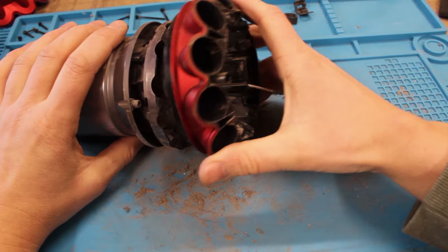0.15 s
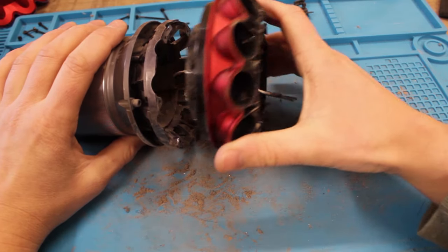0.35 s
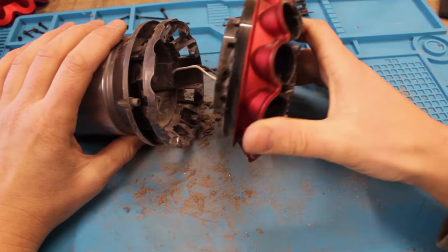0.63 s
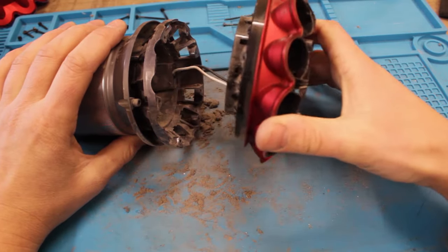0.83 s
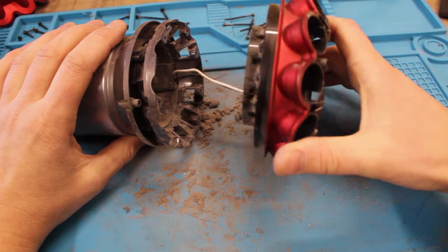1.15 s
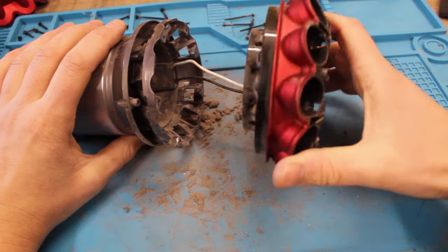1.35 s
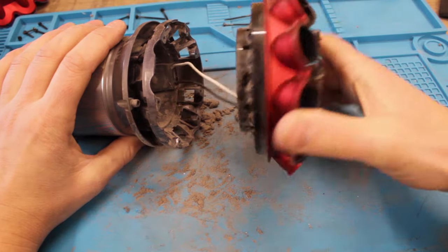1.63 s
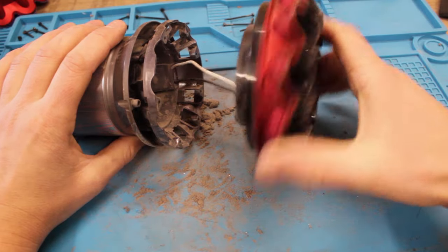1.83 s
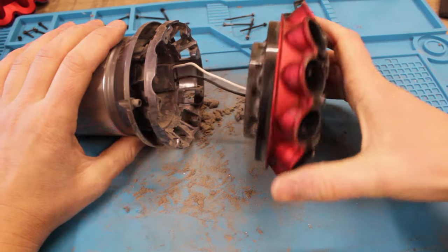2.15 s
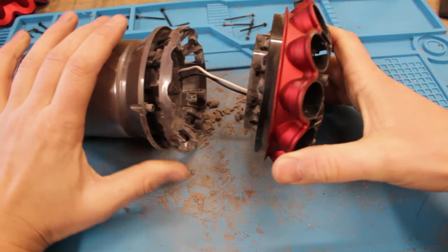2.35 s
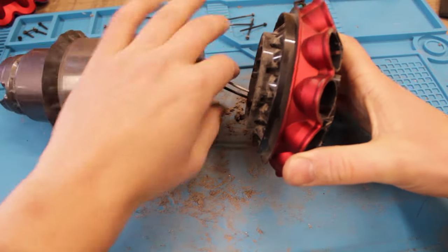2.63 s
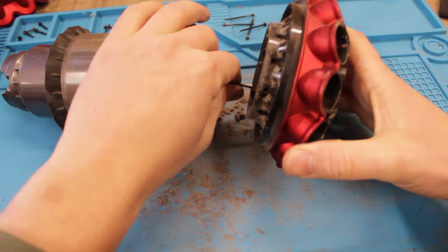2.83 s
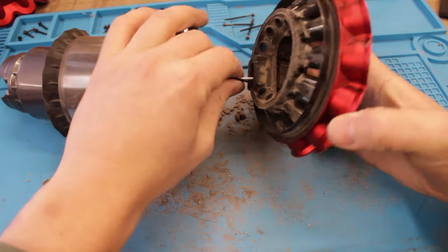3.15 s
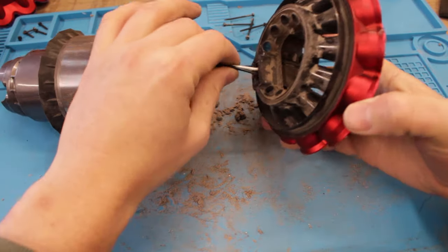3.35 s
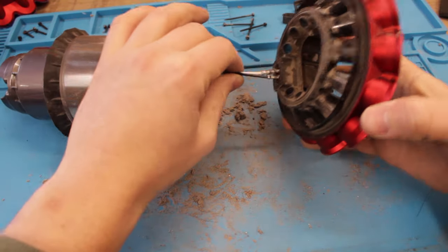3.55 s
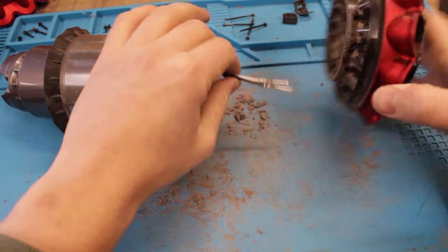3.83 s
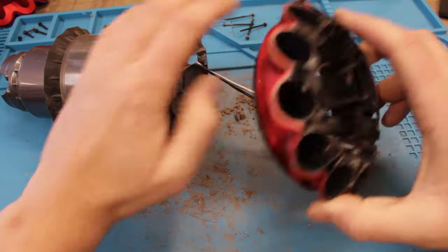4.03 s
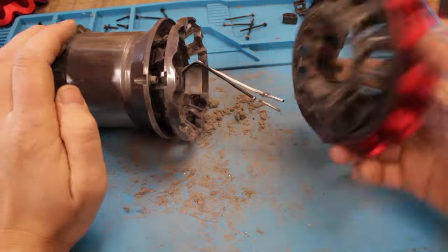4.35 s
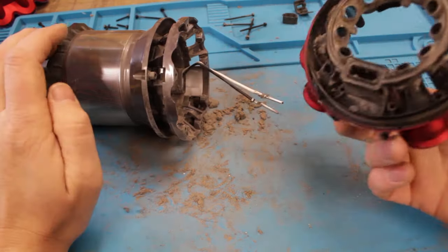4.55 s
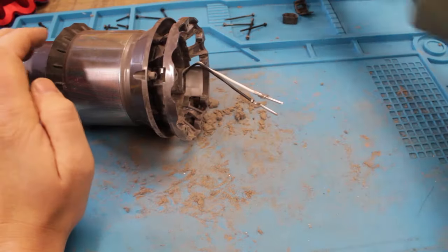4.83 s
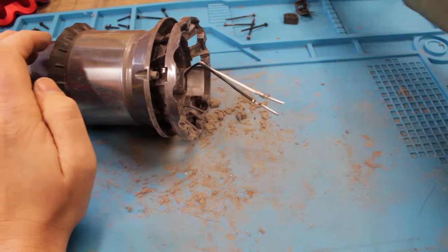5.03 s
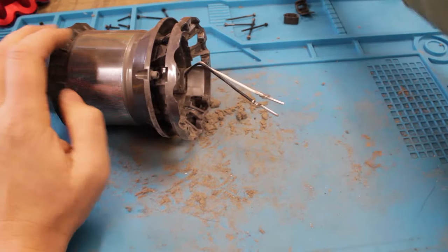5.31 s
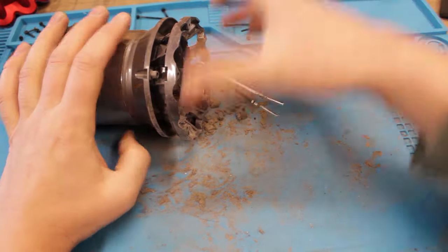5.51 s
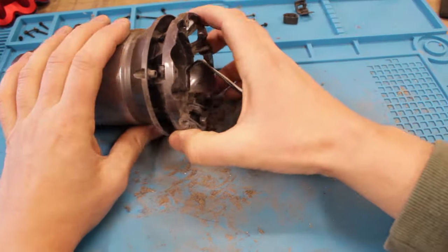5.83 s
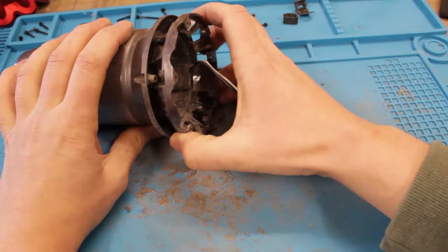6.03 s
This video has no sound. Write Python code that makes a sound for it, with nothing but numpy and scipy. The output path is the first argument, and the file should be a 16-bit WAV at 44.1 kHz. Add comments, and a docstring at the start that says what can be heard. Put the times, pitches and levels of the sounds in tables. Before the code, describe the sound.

Close microphone, small room with a very short reverberation, steady soft noise and a barely audible low hum. From 0 s, faint gritty friction of plastic being drawn off; a soft click at 0.07, then a tight cluster of hollow plastic clicks around 0.6 with a tiny squeak. Light rubbing and a thin squeak near 1.0-1.2. Hard clicks at 1.4, a bright one at 1.73, and a stronger one at 1.96. Dull soft bumps on the mat at 2.1 and 2.45. Short slides lead to thin metallic ticks from 2.8 to 3.25, then the loudest, sharpest double snap at 3.3, with smaller ticks until 3.8. Near quiet from 4 to 5, with only faint rubs. Two loud, resonant woody-plastic knocks at 5.12 and 5.27, the second with a bright click, then a weaker rocking tap at 5.32. Faint finger slides and tiny ticks from 5.6 to the end, just past 6.

```python
"""A scrape and hard clicks: hands pull a plastic ring off a vacuum cleaner's cyclone housing, over a rubber mat.
Clicks and snaps are chattering contacts ringing the shell or thin metal rods; scrapes and squeaks are filtered friction.
The ring is set down on the bench with two loud knocks and some fainter ones, made of damped modes and dense noise.
Soft bumps on the mat excite the bench's lowest modes; a small room answers, over steady noise and a faint low hum."""
import sys
import numpy as np
from scipy import signal
from scipy.fft import rfft, irfft, next_fast_len
from scipy.io import wavfile
from scipy.ndimage import uniform_filter1d, minimum_filter1d, map_coordinates

SR = 44100
rng = np.random.default_rng(int(sys.argv[2]) if len(sys.argv) > 2 else 0)


def inscribe(sig):
    """Save sig as 16-bit PCM at rate SR to the path in sys.argv[1].

    A 1-D sig is mono; a 2-D sig holds one channel per row.
    Samples are clipped to [-1, 1] before scaling.
    """
    pcm = np.round(np.clip(np.atleast_2d(sig).T, -1, 1) * 32767)
    wavfile.write(sys.argv[1], SR, pcm.astype(np.int16))


N = 272538  # samples

# Ring catching on a hard edge. Each row: start in seconds, level in dB before gain_db,
# brightness in dB per octave, favoured resonance in Hz.
CLICKS = [(0.068, -23, -4.5, 1192), (0.574, -28.5, -4, 1165), (0.612, -16, -0.4, 2010),
          (0.646, -14.5, 1, 2520), (0.659, -12.5, 2, 1174), (0.8, -34, 0.5, 3240), (1.41, -14, -1, 2730),
          (1.422, -17, -0.5, 3460), (1.442, -16, 6, 2880), (1.732, -14.5, 7.5, 7370),
          (1.776, -21, 1.8, 5050), (1.835, -35, -2, 3000), (1.941, -21.5, 1.5, 5300),
          (1.957, -9.5, -1, 2940), (2.457, -25, -9, 1402), (5.272, -13.5, 2, 5770), (5.734, -33, 0.8, 5170),
          (5.987, -38.5, 7, 1140), (6.104, -34, 11.5, 3750)]
# Band edges in Hz.
CLICK_EDGES_HZ = [600, 2400, 6000, 16000]
# Tone shared by all clicks: relative dB in the low, middle and high band.
CLICK_TONE_DB = [-13, -8, -18]
# Resonances of the plastic shell, also heard in scrape(). Each row: centre in Hz, width in Hz, relative level in dB.
SHELL = [(1170, 62, -3), (1364, 64, 2.5), (2150, 540, -5.5), (2820, 124, 3), (3373, 190, -7.5),
         (3653, 67, -3), (4116, 220, -8.5), (4960, 190, -2), (5510, 190, -13), (5590, 13, -3.5),
         (6440, 160, -15.5), (7410, 160, -4.5), (9000, 41, -30.5), (9000, 89, -7), (9860, 56, -13.5),
         (9800, 28, -13), (12400, 180, -27.5), (12600, 84, -27)]


def ring_clicks():
    """Plastic contacts ring the shell."""
    return contacts(CLICKS, CLICK_EDGES_HZ, CLICK_TONE_DB, SHELL, contact_t60_s=0.03, crack_db=2.0, spot_db=-4.5,
                    spot_q=26, rise_s=0.00046, hardening=0.08, soft_hz=12000, gain_db=-10.5, wet_db=-10.0)


# Rods catching on the ring. Each row: start in seconds, level in dB before gain_db,
# brightness in dB per octave, favoured resonance in Hz.
SNAPS = [(2.788, -19, 0.5, 4040), (2.795, -13, 2, 6020), (2.888, -20.5, -1, 4300), (3.067, -25, -1, 4750),
         (3.073, -13.5, 0.5, 4120), (3.078, -19, -1.5, 4200), (3.148, -19.5, 1.5, 5940),
         (3.227, -13.5, 0, 3520), (3.248, -14.5, -0.5, 3580), (3.303, 2.5, -2, 3600), (3.32, 7.5, 7, 11300),
         (3.343, -8, 1.5, 4620), (3.511, -17.5, -3, 4250), (3.648, -20, -1, 3400), (3.708, -21, 4, 6360),
         (3.809, -36.5, 0, 3540)]
# Band edges in Hz.
SNAP_EDGES_HZ = [800, 3000, 9000, 16000]
# Tone shared by all snaps: relative dB in the low, middle and high band.
SNAP_TONE_DB = [-22, -9, -18]
# Resonances of the metal rods. Each row: centre in Hz, width in Hz, relative level in dB.
RODS = [(1753, 62, 8), (2027, 37, 5.5), (3100, 58, -28), (3320, 130, -5), (3780, 79, 3.5), (4350, 51, 3),
        (4740, 110, -8), (5370, 130, -12), (5890, 140, -5), (6180, 113, 3.5), (7050, 270, -5.5),
        (8230, 220, 4), (9760, 230, -31), (11540, 150, -9.5), (11540, 130, -3.5), (11980, 250, -9.5),
        (14050, 870, -6)]


def rod_snaps():
    """Shorter, brighter contacts ring the thin rods."""
    return contacts(SNAPS, SNAP_EDGES_HZ, SNAP_TONE_DB, RODS, contact_t60_s=0.015, crack_db=3.5, spot_db=-5.5,
                    spot_q=27, rise_s=0.0001, hardening=1.0, soft_hz=18250, gain_db=-11, wet_db=-10.5)


def contacts(table, edges_hz, tone_db, body, contact_t60_s, crack_db, spot_db, spot_q, rise_s, hardening,
             soft_hz, gain_db, wet_db):
    """Hard contacts: a few milliseconds of chatter ring the body, and some is heard directly as a crack."""
    out, t = np.zeros(N), np.arange(SR // 3) / SR
    for start_s, db, brightness, spot_hz in table:
        attack_s = rise_s * amp(-hardening * db)  # harder blows bite faster
        chatter = rng.standard_normal(len(t)) * fade(t, contact_t60_s) * (1 - np.exp(-t / attack_s))
        crack = highpassed(chatter, 900)  # small parts radiate little bass
        spot = resonate(chatter, [(spot_hz, spot_hz / spot_q, 0)])  # each place of contact favours one resonance
        click = unit(resonate(chatter, body)) + amp(spot_db) * unit(spot) + amp(crack_db) * unit(crack)
        click = filtered(click, lambda hz: 1 / (1 + (hz / soft_hz) ** 6))  # softer material, duller top
        click = voiced(click, edges_hz, tone_db, brightness, size=180)
        add(out, start_s, in_room(amp(db + gain_db) * click, wet_db))
    return out


# Ring landing and rocking on the bench. Each row: start in seconds, level in dB before gain_db,
# brightness in dB per octave, favoured mode in Hz, its dB against the knock.
KNOCKS = [(5.067, -32, 0, 587, 7), (5.118, -2, -1.5, 523, -8), (5.272, 0.5, 0.43, 711, -16),
          (5.321, -18, -.7, 800, -4), (5.362, -32.5, 4, 2086, -1)]
# Band edges in Hz.
KNOCK_EDGES_HZ = [160, 450, 650, 1400, 4500, 7000, 16000]
# Tone shared by all knocks: relative dB in six bands from low to high.
KNOCK_TONE_DB = [-16.5, -16.5, -13.5, -15, -27, -30.5]
# Modes of the ring on the bench top. Each row: frequency in Hz, relative level in dB, t60 in seconds.
BENCH = [(194.7, 4.5, 0.092), (230, -2, 0.094), (348.4, 1, 0.11), (397.4, -2, 0.16), (520, -2.5, 0.13),
         (591, 2, 0.08), (718, 0.5, 0.16), (807, -9, 0.2), (945, -1, 0.12), (1056, -17, 0.28),
         (1130, -9, 0.17), (1237, -20, 0.26), (1350, -17, 0.22), (1540, -22, .11), (1641, -2, 0.11),
         (1754, -3, 0.048), (1870, -10, 0.07), (2064, -6.5, 0.1), (2240, -27, 0.051), (2730, -22.5, 0.15),
         (4180, -28, .1), (4910, -13, 0.072), (5340, -5.5, 0.019), (7840, -28, 0.1)]
# Spectrum of the dense modes. Each row: frequency in Hz, relative density in dB per Hz.
KNOCK_NOISE = [(59, -46), (100, -39), (160, -15), (289, -10), (535, -6), (1360, -14), (2130, -17),
               (2370, -24), (3700, -43), (4020, -30), (5770, -31), (8460, -49.5), (16000, -55)]


def set_down(noise_db, noise_t60_s, spot_q, gain_db, wet_db):
    """The ring lands on one edge, tips onto the other and rocks to rest; each knock rings damped modes."""
    out, t = np.zeros(N), np.arange(SR // 2) / SR
    for start_s, db, brightness, spot_hz, spot_db in KNOCKS:
        # modes too close to tell apart
        dense = coloured(rng.standard_normal(len(t)), KNOCK_NOISE) * fade(t, noise_t60_s)
        rocking = amp(2.5 * wobble(97, size=len(t)))  # the rocking contact roughens the ring
        ring = ringing(t, BENCH, scatter_db=1) * rocking
        knock = highpassed(unit(ring) + amp(noise_db) * unit(dense), 60)
        knock = voiced(knock, KNOCK_EDGES_HZ, KNOCK_TONE_DB, brightness, size=440)
        # each edge favours one mode
        spot = np.sin(2 * np.pi * spot_hz * t) * np.exp(-np.pi * spot_hz * t / spot_q)
        knock = knock + amp(spot_db) * spot * rocking
        add(out, start_s, in_room(amp(db + gain_db) * knock, wet_db))
    return out


# Friction as the ring is drawn off the housing and along the rods. Each row: time in seconds, level in dB.
PULL = [(0, -42.5), (0.04, -56.5), (0.13, -60), (0.25, -47), (0.35, -56), (0.43, -57), (0.48, -48),
        (0.68, -50), (0.79, -55.5), (0.9, -58), (1.38, -83), (1.53, -48), (1.7, -66.5), (1.89, -53),
        (2.02, -54), (2.16, -59)]
PULL_BRIGHTNESS_DB_PER_OCTAVE = -0.27
# Short slides of fingers, ring and rods. Each row: start in seconds, length in seconds, level in dB,
# brightness in dB per octave.
STROKES = [(0.95, 0.056, -46.5, -2), (1.08, 0.14, -52.5, -2), (1.399, 0.02, -42.5, -2.5),
           (1.73, 0.079, -45.5, -2), (1.924, 0.024, -45.5, -4.5), (2.236, 0.19, -48.5, 1.5),
           (2.422, .07, -43, -1), (2.694, 0.043, -42.5, 1.5), (2.742, 0.074, -46, 1),
           (3.187, 0.082, -37, 5), (3.449, 0.11, -51.5, 7), (3.596, 0.059, -52, 1.5),
           (3.695, 0.12, -52.5, 6.5), (3.921, 0.19, -57.5, 1.5), (4.39, 0.24, -60, -1),
           (5.692, 0.12, -51.5, 4.5), (5.863, 0.086, -52.5, 1), (5.95, 0.21, -54, 1)]
# Plastic sticking and slipping on one note. Each row: start in seconds, length in seconds, level in dB, pitch in Hz.
SQUEAKS = [(0.512, .13, -50, 2730), (1.0, 0.42, -57.5, 820), (1.08, 0.13, -46.5, 2670),
           (1.764, 0.05, -45, 3000), (2.315, 0.08, -52.5, 2500), (2.696, 0.12, -47.5, 3260),
           (3.197, 0.1, -45.5, 2010), (4.385, 0.25, -59, 1252), (4.764, 0.26, -62, 1200),
           (5.59, 0.073, -54.5, 558)]


def rubbing(squeak_q, wet_db):
    """One long pull and short strokes of friction; squeaks are friction through a sharp resonance."""
    pull_db = np.interp(np.arange(N) / SR, *np.transpose(PULL), right=-np.inf)
    out = amp(pull_db) * scrape(N, PULL_BRIGHTNESS_DB_PER_OCTAVE)
    t = np.arange(SR // 2) / SR
    for start_s, length_s, db, brightness in STROKES:
        add(out, start_s, amp(db) * slide(t, length_s) * scrape(len(t), brightness))
    for start_s, length_s, db, hz in SQUEAKS:
        narrow = resonate(friction(len(t)), [(hz, hz / squeak_q, 0)])
        squeak = resonate(narrow, [(hz, hz / 2, 0)])
        add(out, start_s, amp(db) * slide(t, length_s) * unit(squeak))
    return in_room(out, wet_db)


def friction(size, slip_rate_hz=330, grit_db=1, judder_db=3):
    """Force between dusty surfaces: a fine hiss and tiny slips, under a juddering hand."""
    slips = (rng.random(size) < slip_rate_hz / SR) * rng.standard_normal(size)
    force = rng.standard_normal(size) + amp(grit_db) * unit(slips)
    return force * amp(judder_db * wobble(70, size=size))


# Spectrum of friction heard directly. Each row: frequency in Hz, relative density in dB per Hz.
SCRAPE = [(350, -35), (600, -9.5), (679, -9), (768, -8.5), (1160, -4), (1900, -11.5), (2870, -4),
          (3730, -4), (5260, -7), (8160, -13), (11800, -14.5), (13600, -22.5), (16000, -32)]


def scrape(size, brightness, shell_db=-2):
    """Friction heard directly and through the shell, at rms 1."""
    force = friction(size)
    x = unit(coloured(force, SCRAPE)) + amp(shell_db) * unit(resonate(force, SHELL))
    return unit(filtered(x, lambda hz: amp(brightness * np.log2(np.maximum(hz, 700) / 700))))


def slide(t, length_s):
    """A slide gathers speed for 43% of its length and slows again; its power follows the speed."""
    return np.sqrt(np.interp(t / length_s, [0, 0.43, 1], [0, 1, 0]))


# Housing and hands bumping the mat. Each row: start in seconds, level in dB before gain_db,
# brightness in dB per octave.
BUMPS = [(0.072, -33, 0), (1.643, -40, 3), (2.092, -21.5, 1.3), (2.441, -26, -2.5), (2.464, -24.5, -5.5),
         (3.932, -42, 0), (4.72, -44, 12), (5.001, -37.5, 16), (5.595, -46.5, 7), (5.673, -43.5, 9.5),
         (5.734, -39, 10), (5.788, -43.5, 11)]
# Band edges in Hz.
BUMP_EDGES_HZ = [25, 100, 220, 700]
# Tone shared by all bumps: relative dB in the low, middle and high band.
BUMP_TONE_DB = [-11, -7, -20.5]
# Modes of the bench under the mat. Each row: frequency in Hz, relative level in dB, t60 in seconds.
MAT = [(53.7, 3, 0.32), (73.4, -18, 0.049), (132.8, 0.5, 0.23), (154.8, -5, 0.16), (204, -11, 0.016),
       (258, -10, 0.11), (354, -8.5, 0.076), (434, -21.5, 0.14)]


def bumps(rise_s, push_t60_s, thud_db, gain_db, wet_db):
    """The soft mat lets only a dull push and the bench's lowest modes sound."""
    out, t = np.zeros(N), np.arange(SR // 2) / SR
    push_spectrum = [(20, -6), (70, 20.5), (350, -7.5), (700, -9.5), (2000, -37)]  # (Hz, relative dB)
    for start_s, db, brightness in BUMPS:
        thud = coloured(rng.standard_normal(len(t)), push_spectrum) * fade(t, push_t60_s)
        bump = unit(ringing(t, MAT, scatter_db=1.5)) + amp(thud_db) * unit(thud)
        bump = bump * (1 - np.exp(-t / rise_s))
        bump = voiced(bump, BUMP_EDGES_HZ, BUMP_TONE_DB, brightness, size=880)
        add(out, start_s, in_room(amp(db + gain_db) * bump, wet_db))
    return out


# Reverberation. Each row: frequency in Hz, t60 in seconds.
ROOM = [(150, 0.3), (1000, 0.19), (5000, 0.17), (15000, 0.15)]


def in_room(x, wet_db):
    """x plus a diffuse noise tail, building up over about 1.3 ms, with treble dying first."""
    hz, t, z = signal.stft(rng.standard_normal(SR // 3), SR, nperseg=256)
    tail = signal.istft(z * fade(t, along(ROOM, hz)[:, None]), SR, nperseg=256)[1]
    tail = tail * (1 - np.exp(-np.arange(len(tail)) / SR / 0.0013))
    return x + amp(wet_db) * signal.fftconvolve(x, tail / np.linalg.norm(tail))[:len(x)]


# Room noise spectrum. Each row: frequency in Hz, relative density in dB per Hz.
AIR = [(15, -54.5), (25, -23), (43, -16), (58, -13.5), (80, -8), (114, -13), (200, -11), (249, -13),
       (344, -13), (560, -15.5), (863, -17), (1070, -18), (2000, -19.5), (2910, -21), (16000, -35.5)]
AIR_RMS_DB = -55.5
# Low hum that changes pitch once. Each row: start in seconds, end in seconds, frequency in Hz, mean level in dB.
HUM = [(0, 2.6, 49.76, -59), (2.6, 7.3, 75.4, -58.5)]


def room_tone():
    """Steady coloured noise with a faint, slightly wavering sine hum."""
    t = np.arange(N) / SR
    hum = np.zeros(N)
    for start_s, end_s, hz, db in HUM:
        gate = uniform_filter1d(1. * ((t >= start_s) & (t < end_s)), size=2000)
        hum += amp(db + 0.58 * wobble(3.76)) * gate * np.sin(2 * np.pi * hz * t)
    return amp(AIR_RMS_DB) * unit(coloured(rng.standard_normal(N), AIR)) + hum


def amp(db):
    """Decibels to gain."""
    return 10 ** (np.asarray(db) / 20)


def unit(x):
    """Scaled to rms 1."""
    return x / np.sqrt(np.mean(x ** 2) + 1e-20)


def along(points, hz):
    """(Hz, value) points read on a log axis."""
    f, v = np.transpose(points)
    return np.interp(np.log(hz + 1), np.log(f + 1), v)


def fade(t, t60_s):
    """Exponential decay, 60 dB in t60_s."""
    return np.exp(-np.log(1000) * t / np.maximum(t60_s, 1e-3))


def wobble(rate_hz, size=N):
    """A smooth random curve, rate_hz knots a second."""
    knots = rng.standard_normal(int(size * rate_hz / SR) + 4)
    return map_coordinates(knots, [np.arange(size) * rate_hz / SR])


def filtered(x, response):
    """x times a response of frequency."""
    m = next_fast_len(len(x) + SR // 4)
    return irfft(rfft(x, m) * response(np.fft.rfftfreq(m, 1 / SR)), m)[:len(x)]


def highpassed(x, corner_hz):
    """x through two first-order highpasses."""
    return filtered(x, lambda hz: (1j * hz / (1j * hz + corner_hz)) ** 2)


def coloured(x, spectrum):
    """x shaped by (Hz, dB) points."""
    return filtered(x, lambda hz: amp(along(spectrum, hz)))


def resonate(x, peaks):
    """x through a body's parallel resonances, with alternating signs."""
    def response(f):
        return sum((-1) ** k * amp(db) * 1j * f * width / (centre * centre - f * f + 1j * f * width)
                   for k, (centre, width, db) in enumerate(peaks))
    return filtered(x, response)


def ringing(t, modes, scatter_db):
    """Damped modes, each struck at a new strength and sign."""
    out = np.zeros(len(t))
    for hz, db, t60_s in modes:
        strength = rng.choice([-1, 1]) * amp(db + scatter_db * rng.standard_normal())
        out += strength * fade(t, t60_s) * np.sin(2 * np.pi * hz * t)
    return out


def voiced(x, edges_hz, tone_db, brightness, size):
    """A body's tone, tilted by the hardness of the contact; the first size samples get rms 1."""
    hz = np.fft.rfftfreq(len(x), 1 / SR)
    centres = np.sqrt(np.multiply(edges_hz[:-1], edges_hz[1:]))
    band_db = tone_db + brightness * np.log2(centres / centres[0])
    for _ in range(2):  # the second pass corrects overlap between bands
        power = np.histogram(hz, edges_hz, weights=abs(rfft(x)) ** 2)[0]
        gain_db = band_db - 10 * np.log10(power + 1e-20)
        x = coloured(x, np.column_stack([centres, gain_db]))
    return x / np.sqrt(np.mean(x[:size] ** 2))


def add(track, start_s, x):
    """Mix x into the track from start_s."""
    part = track[max(round(start_s * SR), 0):][:len(x)]
    part += x[:len(part)]


def scene():
    """All the handling and the room tone, in one channel."""
    plastic = ring_clicks()
    rods = rod_snaps()
    landing = set_down(noise_db=0, noise_t60_s=0.059, spot_q=68, gain_db=-10.5, wet_db=-12.5)
    sliding = rubbing(squeak_q=11, wet_db=-10.0)
    mat = bumps(rise_s=0.00057, push_t60_s=0.26, thud_db=-6.5, gain_db=-9, wet_db=-8.5)
    return (plastic + rods + landing + sliding + mat + room_tone())[None]


LIMIT_DB, RECOVERY_DB_PER_S = -3.5, 37


def limiter(x):
    """Peaks push the gain down at once; it recovers at a steady rate."""
    over_db = np.maximum(20 * np.log10(abs(x) + 1e-9) - LIMIT_DB, 0)
    recovered_db = RECOVERY_DB_PER_S * np.arange(N) / SR
    cut_db = np.maximum.accumulate(over_db + recovered_db) - recovered_db
    return x * uniform_filter1d(minimum_filter1d(amp(-cut_db), size=16), size=16)


TOP_HZ = 16200


def record(dry):
    """The recorder drops the deepest bass, limits the highest peaks and keeps nothing well above TOP_HZ."""
    x = signal.sosfilt(signal.butter(4, 30, "highpass", fs=SR, output="sos"), dry[0])
    return filtered(limiter(x), lambda hz: np.clip((TOP_HZ - hz) / 600 + .5, 0, 1) ** 2)[None]


dry = scene()
out = record(dry)
inscribe(out)
```